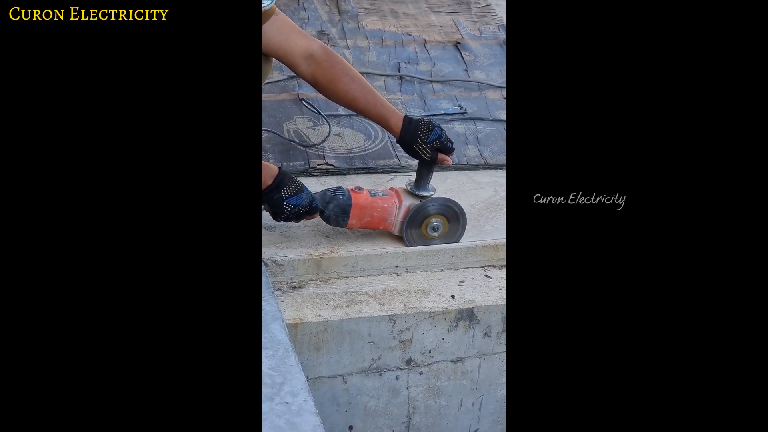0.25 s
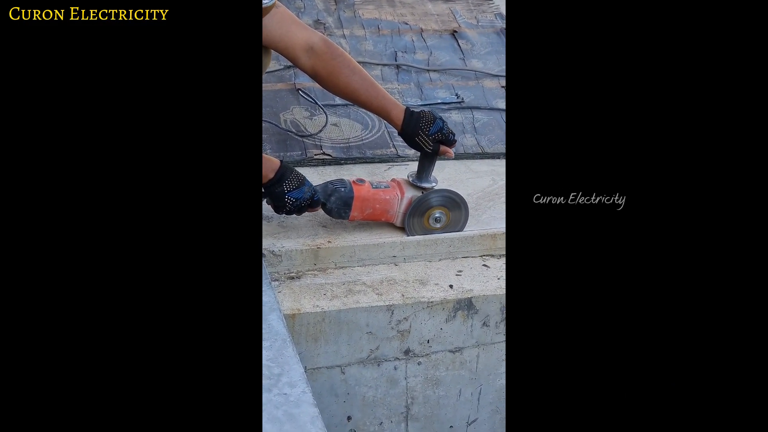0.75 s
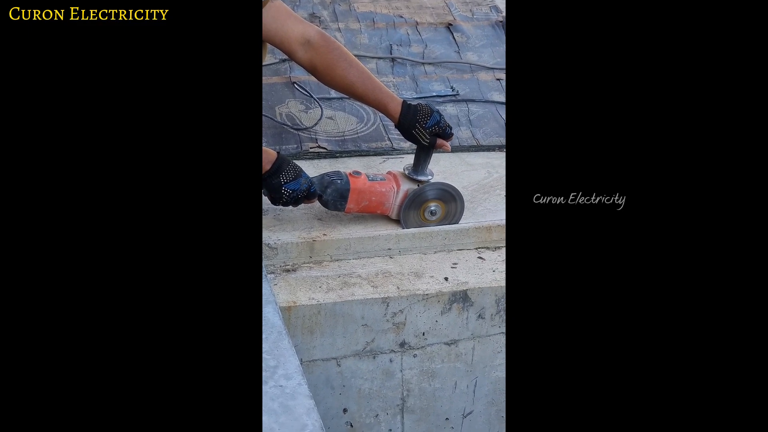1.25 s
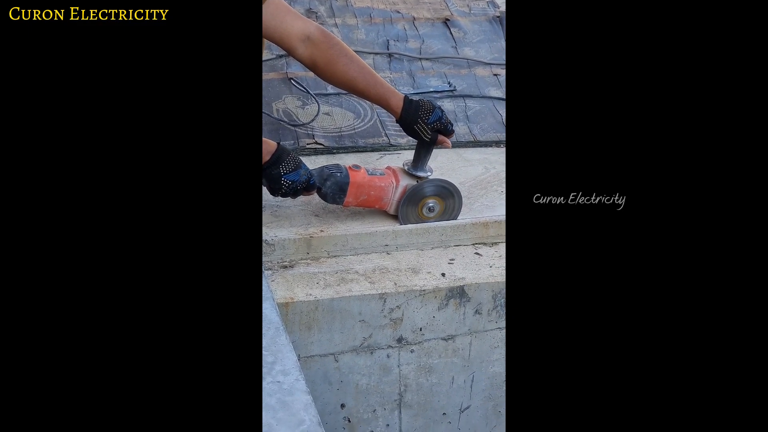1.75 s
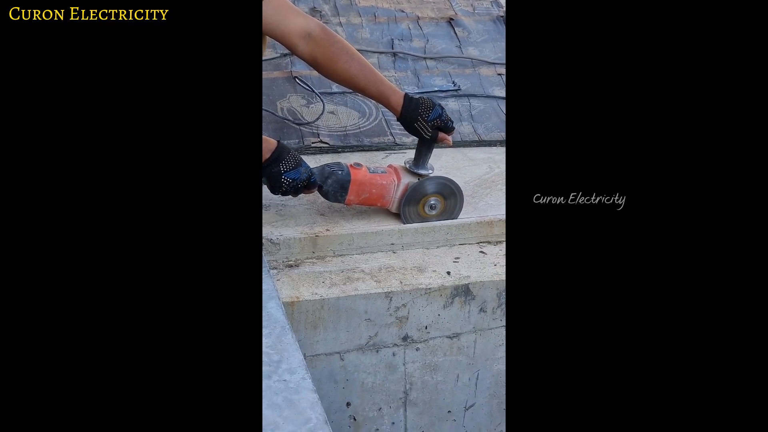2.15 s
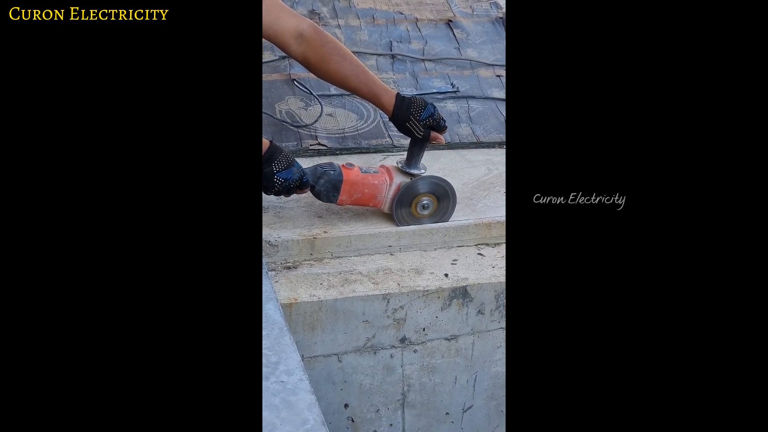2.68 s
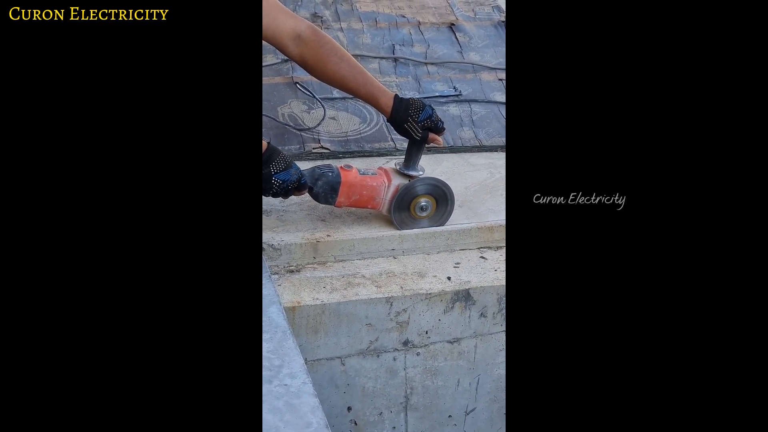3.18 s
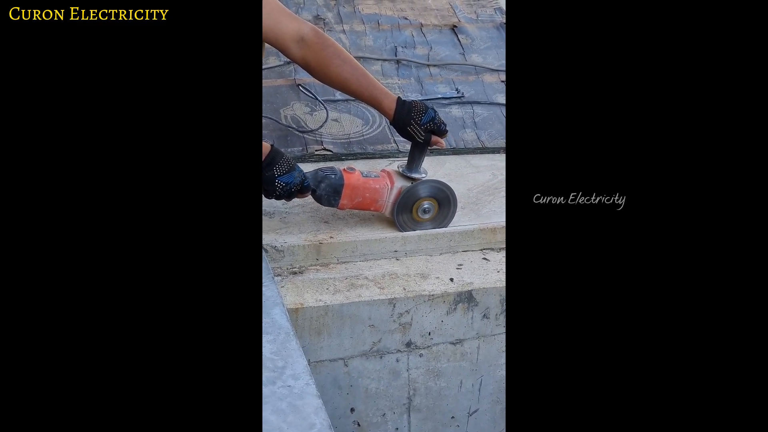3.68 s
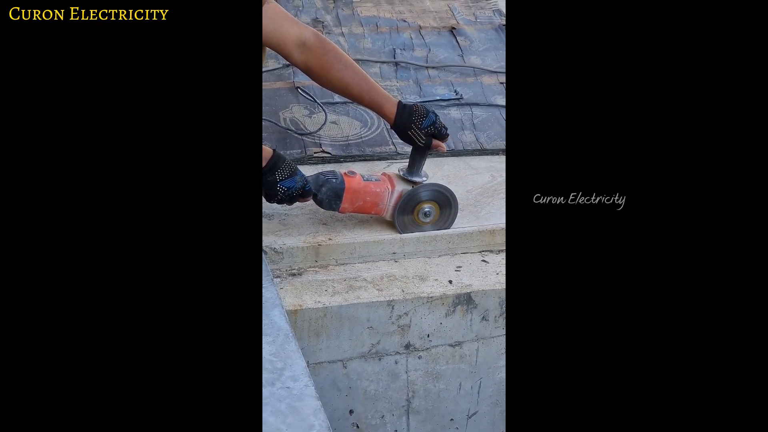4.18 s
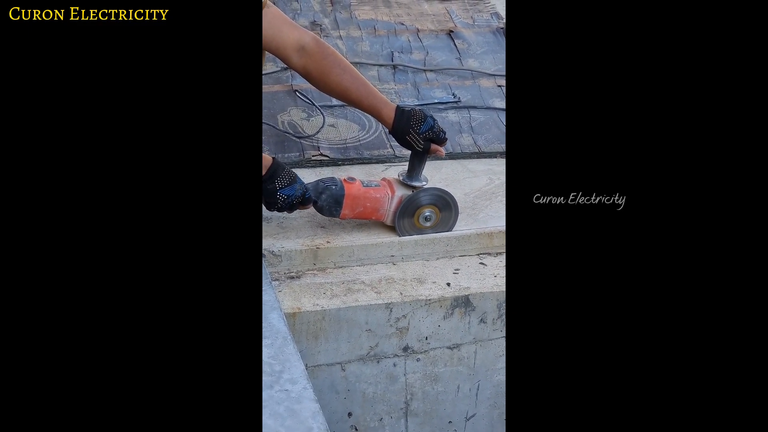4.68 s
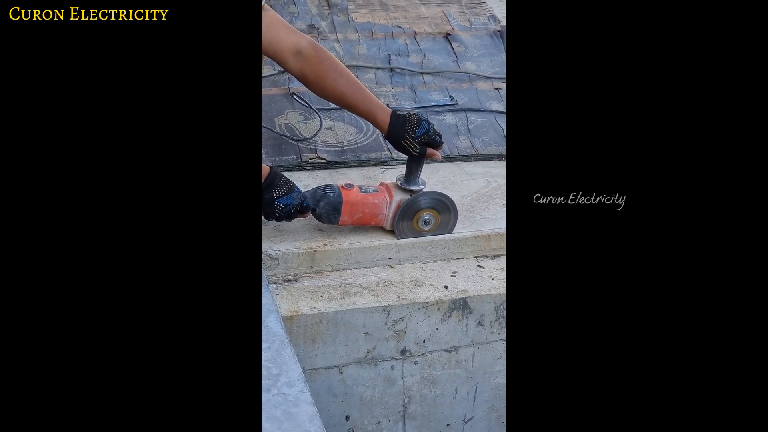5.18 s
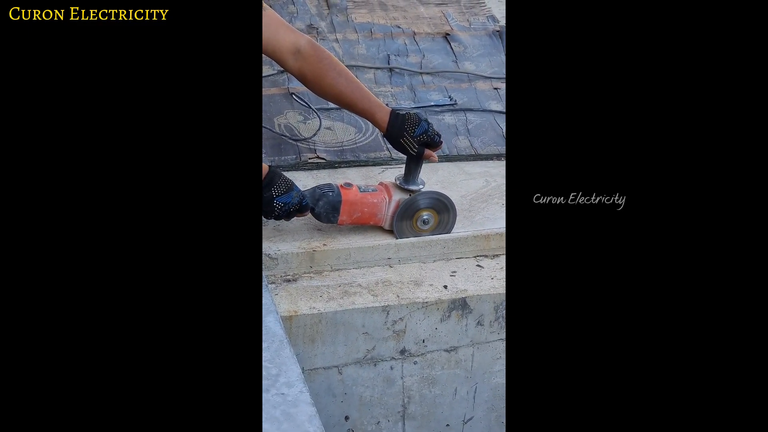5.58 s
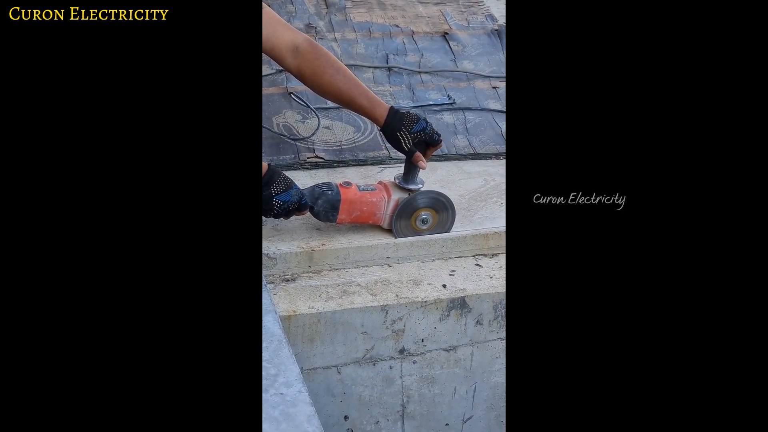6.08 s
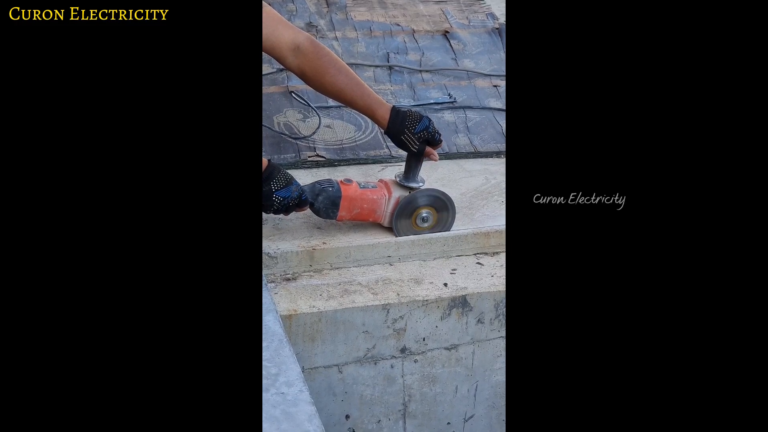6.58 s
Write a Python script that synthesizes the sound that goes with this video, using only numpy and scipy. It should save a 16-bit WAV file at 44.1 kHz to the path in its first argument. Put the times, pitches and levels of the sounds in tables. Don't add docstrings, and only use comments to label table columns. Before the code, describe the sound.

A handheld angle grinder runs without pause, its disc scraping and biting into a concrete slab close to a stereo microphone outdoors. Dense metallic hiss dominates, with ringing around the upper midrange and a bright rim whistle. The tone shifts as the tool advances, then leans to the right. Underneath are a faint wavering motor whine, a far generator hum and light wind buffeting, strongest in the first three seconds.

```python
import sys
import numpy as np
from scipy import signal
from scipy.io import wavfile
from scipy.ndimage import uniform_filter1d

SR = 44100
rng = np.random.default_rng(int(sys.argv[2]) if len(sys.argv) > 2 else 0)


def master(y):
    cut = np.clip(np.atleast_2d(y).T, -1, 1)
    pcm = np.round(cut * 32767)
    wavfile.write(sys.argv[1], SR, pcm.astype(np.int16))


def decibels_to_gain(level_db):
    exponent = np.asarray(level_db, float) / 20
    return 10 ** exponent


N = 301644
SIZE, HOP = 2048, 512


def read(points, hz):
    f, value = np.transpose(points)
    return np.interp(np.log(hz + 1), np.log(f + 1), value)


def column(rows, t, order):
    return np.interp(t, np.transpose(rows)[0], np.transpose(rows)[order])


def along(place, rows):
    return np.transpose([np.interp(place, range(3), row) for row in rows])


def evened(x):
    return x / np.sqrt(np.mean(x ** 2) + 1e-20)


def drift(shape, span):
    steps = max(int(span), 1)
    once = uniform_filter1d(rng.standard_normal(shape), steps, 0)
    return evened(uniform_filter1d(once, steps, 0))


def mottle(shape, span, bins):
    return evened(uniform_filter1d(drift(shape, span), size=bins, axis=1))


def bell(x, centre, width):
    return np.exp(-(2 * (x - centre) / width) ** 2)


def spells(t, rest_db, rows):
    bumps = sum(decibels_to_gain(2 * db) * bell(t, s, length) for s, length, db in rows)
    return 10 * np.log10(decibels_to_gain(2 * rest_db) + bumps)


def grid():
    return np.arange(N // HOP + 5) * HOP / SR, np.fft.rfftfreq(SIZE, 1 / SR)


def pair(left, right, same):
    a, b, c, d = rng.standard_normal((4,) + left.shape)
    same = same / np.maximum(abs(same), 1)
    one = a + 1j * b
    apart = np.sqrt(np.maximum(1 - abs(same) ** 2, 0))
    other = same * one + apart * (c + 1j * d)
    z = np.array([(np.sqrt(left) * one).T, (np.sqrt(right) * other).T])
    return signal.istft(z, nperseg=SIZE, noverlap=SIZE - HOP)[1][:, :N]


def plate_modes(place, hz):
    # (frequency [Hz], likeness at the ports [0-1], right lead early [rad], late [rad])
    modes = np.array([(950.0, 0.8, 0.3, 0.5), (1570.0, 0.83, -0.9, -0.8), (1940.0, 0.5, 0.6, 0.5),
                      (2280.0, 0.84, -0.4, -0.4), (2450.0, 0.9, -0.2, -0.1), (2690.0, 0.52, -0.8, -0.1),
                      (3290.0, 0.53, -2.4, -0.3), (3920.0, 0.45, -2.2, -1.9), (4260.0, 0.53, 2.7, 3.0),
                      (5230.0, 0.73, -0.1, 0.1), (5560.0, 0.67, 0.1, 0.1), (6090.0, 0.52, -2.3, -1.2),
                      (6700.0, 0.54, -0.5, -0.2), (7080.0, 0.43, -1.5, -0.9), (7520.0, 0.5, -1.9, -2.0),
                      (8120.0, 0.35, -1.5, -2.1), (8590.0, 0.21, 2.3, 1.4), (9110.0, 0.33, -0.3, 0.1),
                      (9690.0, 0.33, -0.7, -1.3), (10510.0, 0.36, 0.2, 0.2), (10850.0, 0.44, 0.3, -0.5),
                      (11410.0, 0.36, 1.5, -2.3), (11910.0, 0.38, -0.1, 3.0), (12360.0, 0.3, 0.4, 2.0),
                      (12960.0, 0.5, 0.4, 0.5), (13500.0, 0.41, 0.2, 0.6), (13950.0, 0.55, 0.4, 0.3),
                      (14490.0, 0.25, 0.5, -1.9), (15030.0, 0.19, -0.1, 3.0), (15700.0, 0.32, 2.6, -0.4)])
    # (width [Hz], level at start, middle, end of the cut [dB])
    ports = np.array([(110.0, -29.0, -22.0, -31.0), (100.0, -13.0, -8.0, -10.5),
                      (150.0, -18.5, -14.0, -22.5), (100.0, 0.5, 2.0, 1.0), (170.0, -4.5, -8.5, -6.5),
                      (160.0, -14.0, -16.0, -29.0), (100.0, -17.5, -21.5, -28.5),
                      (170.0, -14.5, -13.5, -20.0), (60.0, -17.0, -8.5, -16.0), (60.0, -13.0, -8.5, -17.0),
                      (180.0, -19.0, 3.5, -14.0), (310.0, -10.0, -6.5, -9.0), (130.0, -5.0, -9.0, -5.0),
                      (180.0, -7.5, -6.0, -10.5), (100.0, -16.5, -8.0, -13.5), (170.0, -10.5, -11.5, -7.0),
                      (100.0, -9.5, 7.0, -4.5), (90.0, -13.5, -9.0, -17.0), (190.0, -25.5, -15.0, -12.0),
                      (150.0, -10.5, -9.0, -16.0), (100.0, -15.0, -15.0, -20.5),
                      (100.0, -13.5, -10.5, -11.0), (110.0, -18.0, -12.5, -9.0), (260.0, -7.0, -8.0, -7.5),
                      (190.0, -2.0, -4.5, -2.5), (130.0, -9.0, -7.0, -16.0), (120.0, -3.0, -2.5, -6.5),
                      (150.0, -4.0, -4.0, -5.5), (90.0, -8.0, -6.0, -10.5), (240.0, -4.5, -4.0, -7.5)])
    # (start [dB], middle [dB], end [dB])
    lean = [(0.0, -1.0, 0.0), (-1.0, -3.0, -2.0), (-1.0, -2.0, -2.0), (-1.0, 1.0, 1.0), (-1.0, 0.0, 0.0),
            (-1.0, -1.0, 0.0), (0.0, 1.0, 0.0), (2.0, 2.0, 2.0), (2.0, 1.0, 0.0), (2.0, -1.0, -2.0),
            (0.0, 1.0, -3.0), (1.0, -3.0, 0.0), (-2.0, -3.0, -7.0), (-2.0, -3.0, -4.0), (-1.0, -3.0, -2.0),
            (6.0, 4.0, 1.0), (4.0, 0.0, 5.0), (4.0, 4.0, 1.0), (5.0, 4.0, -3.0), (1.0, 5.0, 2.0),
            (2.0, -1.0, 0.0), (4.0, 1.0, -1.0), (3.0, 3.0, -2.0), (1.0, -1.0, -5.0), (-2.0, -1.0, -9.0),
            (-2.0, -2.0, -6.0), (-6.0, -2.0, -8.0), (0.0, -4.0, -4.0), (-4.0, -2.0, -6.0),
            (-4.0, 0.0, -6.0)]
    # (frequency [Hz], density [dB per Hz])
    grit_hiss = [(100, -26.5), (250, -27), (500, -31.5), (750, -40), (1200, -29),
                 (2000, -16), (3300, -19), (4700, -14), (6000, -12), (8500, -11), (11000, -14),
                 (13000, -10), (15800, -15)]
    # (start [dB], middle [dB], end [dB])
    grit_shift = [0, -1, 0]

    level_db, lean_db = along(place, ports[:, 1:]), along(place, lean)
    level_db += 0.3 * drift(level_db.shape, 27) + 0.7 * drift(level_db.shape, 3.3)
    grit_lean_db = np.array([np.interp(hz, modes[:, 0], row) for row in lean_db])
    lean_db = lean_db + 1.2 * drift(lean_db.shape, 12)

    late = np.clip(place - 1, 0, 1)[:, None]
    spread = np.sqrt(-.9 * np.log(np.clip(modes[:, 1] / .85, .01, 1)))
    wander = spread * drift(lean_db.shape, 12)
    lead = (1 - late) * np.exp(1j * modes[:, 2]) + late * np.exp(1j * modes[:, 3])
    lead = .93 * lead * np.exp(1j * wander)

    detuning = (hz - modes[:, :1]) / (ports[:, :1] * .54)
    shape = 1 / (1 + detuning ** 2) ** 1.3
    power = decibels_to_gain(2 * level_db)

    patches_db = 0.34 * mottle((len(place), len(hz)), 4, 20)
    shift_db = along(place, [grit_shift]) / (1 + (2500 / (hz + 1)) ** 4)
    grit = decibels_to_gain(2 * (read(grit_hiss, hz) + shift_db + patches_db))
    grit_lead = .75 * np.array([np.interp(hz, [0, *modes[:, 0]], [.85, *row]) for row in lead])

    left = (power * decibels_to_gain(lean_db)) @ shape + grit * decibels_to_gain(grit_lean_db)
    right = (power / decibels_to_gain(lean_db)) @ shape + grit / decibels_to_gain(grit_lean_db)
    same = ((power * lead) @ shape + grit * grit_lead) / np.sqrt(left * right)
    same *= np.exp(.6j * np.tanh(hz / 2500) ** 2 * mottle(same.shape, 12, 5))
    return left, right, same


def feed_drive(t, hz, place):
    # (time [s], feed pressure [dB], lightness of the bite [0 firm - 1 skimming])
    feed = [(0, -12.5, 1), (.1, -12, 1), (.65, -14, 0.12), (1.2, -14.5, 0.28), (1.5, -13.5, 0.89),
            (2.1, -13.5, 0.17), (2.3, -14.5, 0.24), (2.68, -13, 1), (2.9, -13, 0.59), (3.45, -14.5, 0.094),
            (3.9, -13.5, 0.63), (4.4, -13.5, 0.98), (4.85, -15, 0.84), (5.2, -15.5, 0.11),
            (5.7, -14.5, 0.66), (6.1, -16, 0.045), (6.75, -14, 1), (6.84, -14.5, 1)]
    # (start [dB], middle [dB], end [dB])
    regions = [(-6.5, -7.5, -8.5), (-5, -4.5, -5.5), (-7, -4.5, -4.5)]
    # (low modes [dB], middle [dB], rim [dB])
    skim = (-1, -3, -0.5)
    # (low modes [dB], middle [dB], rim [dB])
    shudder = (.5, .6, .3)

    low, rim = 1 / (1 + (hz / 3500) ** 6), 1 / (1 + (11200 / (hz + 1)) ** 14)
    drive_db = along(place, regions) + np.outer(column(feed, t, order=2) - .5, skim)
    drive_db = drive_db + np.array(shudder) * drift(drive_db.shape, 4)
    chatter_db = .5 * drift((len(t), 1), 1) * hz / 10000
    return column(feed, t, order=1)[:, None] + drive_db @ np.array([low, 1 - low - rim, rim]) + chatter_db


def echoes(t, hz, place):
    # (frequency [Hz], width [Hz], depth at start, middle, end [dB])
    hollows = np.array([(3400, 240, 5, 6, 9), (4500, 320, 2.5, 12, 8), (5540, 580, 0, 21, 0),
                        (8580, 620, 5, 13, 6), (10270, 270, 0, 1, 3), (11070, 400, .5, 2.5, 4.5)])
    # (centre [s], length [s], frequency [Hz], width [Hz], depth [dB])
    shades = [
        (4.2, 1.0, 6370, 1100, 3.5),
        (3.1, .6, 12800, 2500, 3.5),
        (4, 1.2, 14100, 1200, -2),
        (3.24, 0.27, 1100, 350, -8.5),
    ]
    loss_db = along(place, hollows[:, 2:]) @ bell(hz, hollows[:, :1], hollows[:, 1:2])
    for s, length, f, width, db in shades:
        loss_db = loss_db + db * np.outer(bell(t, s, length), bell(hz, f, width))
    return 2.89 * mottle((len(t), len(hz)), 6, 2) - loss_db


def disc():
    # (time [s], place of the disc along the cut [0 start, 1 middle, 2 end])
    places = [
        (0, 0.054),
        (1.9, 0),
        (2.5, 0.57),
        (3.6, 1.13),
        (4.0, 1.63),
        (4.6, 2.33),
        (6.84, 2.13),
    ]
    t, hz = grid()
    place = column(places, t, order=1)
    left, right, same = plate_modes(place, hz)
    gain = decibels_to_gain(2 * (feed_drive(t, hz, place) + echoes(t, hz, place) - 10.5))
    return pair(left * gain, right * gain, same)


def motor():
    # (time [s], shaft rate [turns per second])
    speed = [(0, 79), (.2, 79.5), (.6, 85), (1.3, 88), (1.9, 92), (2.2, 91), (2.6, 87.5), (3.1, 87),
             (3.3, 85.5), (3.6, 88), (3.9, 89), (4.2, 88), (4.45, 85.5), (5, 90), (5.3, 92), (5.6, 93),
             (6, 97), (6.84, 97.5)]
    # (2 [dB], 3 [dB], 6 [dB], 10 [dB])
    rest = (-62, -58.5, -59.5, -64)
    # (centre [s], length [s], level [dB])
    second = [(1.427, 0.098, -43.5), (2.6, .4, -49.5), (5.457, 0.44, -51), (6.024, 0.31, -48),
              (6.415, 0.2, -47.5)]
    # (centre [s], length [s], level [dB])
    third = [(.95, 0.28, -49), (1.35, 0.35, -40.5), (1.94, 0.24, -48), (2.8, 0.75, -52), (3.8, 0.72, -60),
             (5.3, 0.31, -52.5), (6.4, .3, -63)]
    # (centre [s], length [s], level [dB])
    sixth = [(.2, 0.64, -54), (1.4, 0.7, -59), (2.8, .9, -55), (3.7, 0.79, -59.5), (4.65, 0.26, -52.5),
             (6.3, 0.23, -59)]
    # (centre [s], length [s], level [dB])
    tenth = [(.55, 0.22, -49), (2.3, 0.23, -48), (2.75, 0.63, -53), (3.2, 0.36, -48), (3.75, 0.7, -53),
             (5.0, 0.33, -53), (5.8, 0.34, -56)]
    # (multiple of shaft rate, level relative to order 6 or 10 [dB])
    weak = [(4, -7.5), (5, -5.5), (7, -13.5), (8, -12.5), (9, -18), (11, -1), (12, -6)]
    # (frequency [Hz], width [Hz], level [dB])
    body = (191, 21, -57.5)

    t = np.arange(N) / SR
    turns = np.cumsum(column(speed, t, order=1) + .5 * drift(N, 3760)) / SR
    orders = {}
    for k, db, rows in zip((2, 3, 6, 10), rest, (second, third, sixth, tenth)):
        orders[k] = spells(t, db, rows)
    for k, db in weak:
        orders[k] = db + orders[6 if k < 8 else 10]
    lines = np.zeros(N)
    for k, db in orders.items():
        level = np.sqrt(2) * decibels_to_gain(db + 3.27 * drift(N, 1170))
        lines += level * np.cos(2 * np.pi * (k * turns + rng.random()))

    hz, width, db = body
    pole = np.exp((2j * hz - width) * np.pi / SR)
    ring = signal.lfilter([1], [1, -pole], rng.standard_normal(N)).real
    return lines + decibels_to_gain(db + 3.5 * drift(N, 12000)) * evened(ring)


def generator():
    # (frequency [Hz], level [dB])
    hum = [
        (52.6, -43.3),
        (105.2, -60),
    ]
    t = np.arange(N) / SR + 0.00087 * drift(N, 9000)
    total = np.zeros(N)
    for hz, db in hum:
        total += np.sqrt(2) * decibels_to_gain(db + 1.5 * drift(N, 2500)) * np.sin(2 * np.pi * hz * t)
    return total


def wind():
    # (time [s], breeze level [dB])
    breeze = [(0, -48), (1.0, -45.5), (1.4, -48), (2.3, -44.5), (2.8, -54), (4.7, -56.5), (5.4, -52),
              (6.84, -53)]
    # (centre [s], length [s], level [dB])
    gusts = [(.02, .08, -45), (.25, .15, -49), (.55, .1, -45), (.72, .06, -44), (.87, .1, -44),
             (1.22, .08, -41), (1.43, .25, -38), (1.85, .08, -44), (2.13, .12, -39), (2.3, .08, -44),
             (2.47, .08, -44), (2.88, .1, -49), (3.1, .3, -50), (3.42, .12, -49), (4.88, .08, -51),
             (5.18, .15, -50), (5.58, .1, -49), (6.1, .15, -46), (6.65, .08, -52)]
    # (frequency [Hz], density [dB per Hz])
    colour = [(20, -34), (38, -21), (55, 1.5), (80, 2), (120, -9), (200, -12), (350, -20), (600, -19.5),
              (1200, -59)]
    t, hz = grid()
    lumps_db = 2.5 * drift((len(t), 2), 2)
    level_db = spells(t, column(breeze, t, order=1), gusts)[:, None]
    power = decibels_to_gain(2 * (level_db + read(colour, hz) + 0.5))
    left = power * decibels_to_gain(2 * lumps_db[:, :1] + 4)
    right = power * decibels_to_gain(2 * lumps_db[:, 1:] - 4)
    return pair(left, right, np.full(power.shape, .3))


def scene():
    whine, hum = motor(), generator()
    late_whine, late_hum = np.roll(whine, 6), np.roll(hum, 60)
    machines = np.array([whine + decibels_to_gain(-1.0) * hum, late_whine + decibels_to_gain(-0.7) * late_hum])
    return disc() + machines + wind()


def roll_off(x):
    return signal.sosfilt(signal.butter(12, 16230, fs=SR, output="sos"), x)


def record(dry):
    edge_hz = 15750
    low_pass = signal.firwin(1535, edge_hz, window=("kaiser", 9), fs=SR)
    mix = signal.oaconvolve(np.clip(dry, -1, 1), low_pass[None], "same")
    return roll_off(mix)


dry = scene()
out = record(dry)
master(out)
```